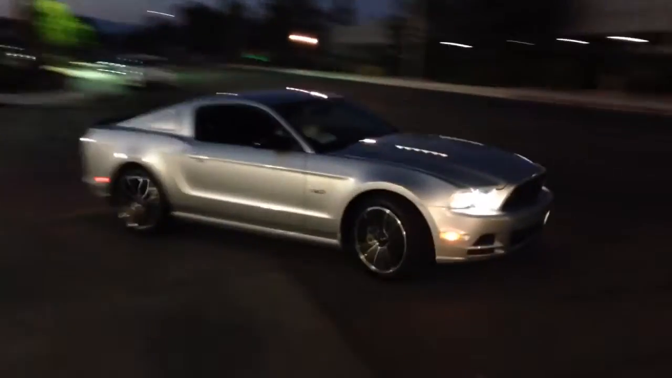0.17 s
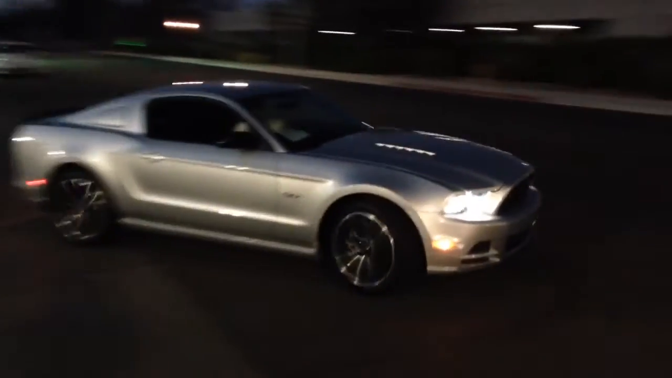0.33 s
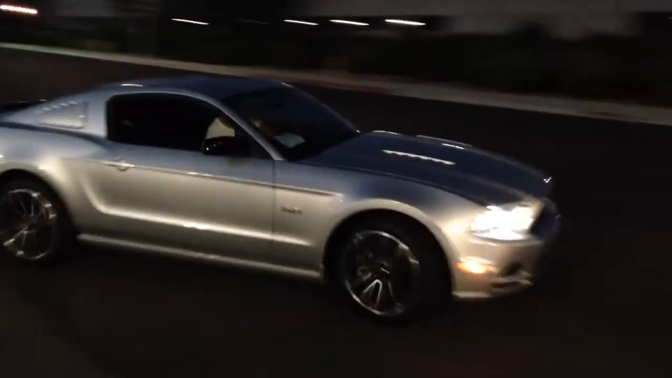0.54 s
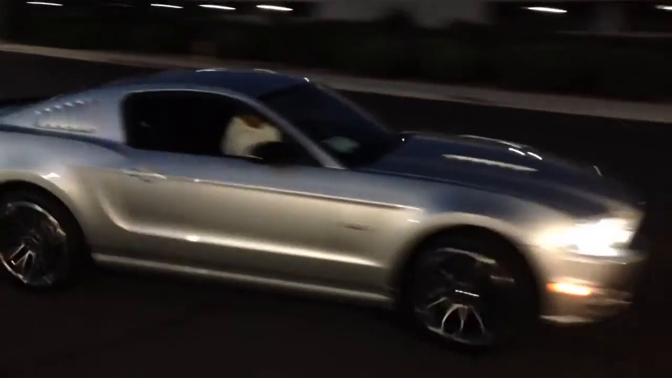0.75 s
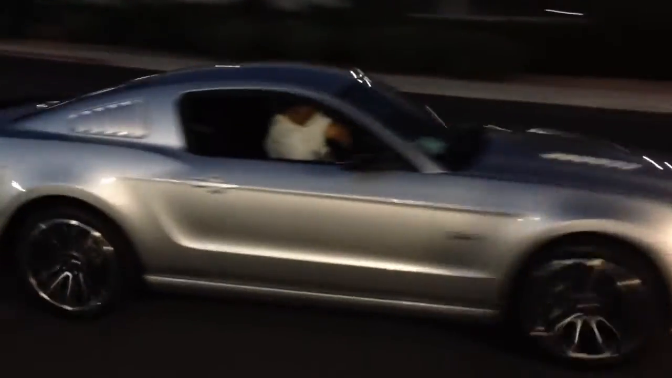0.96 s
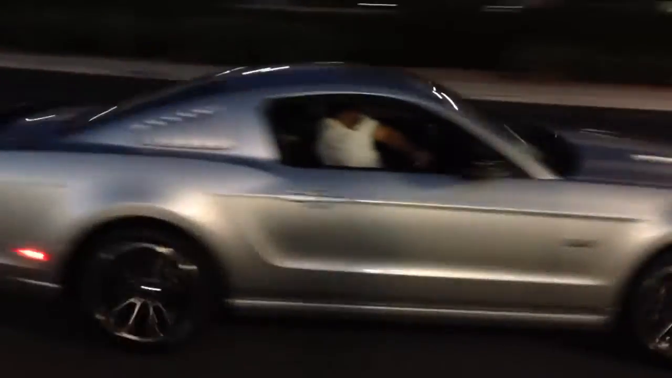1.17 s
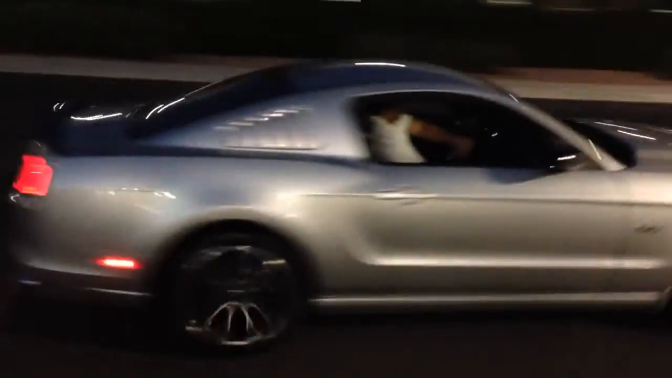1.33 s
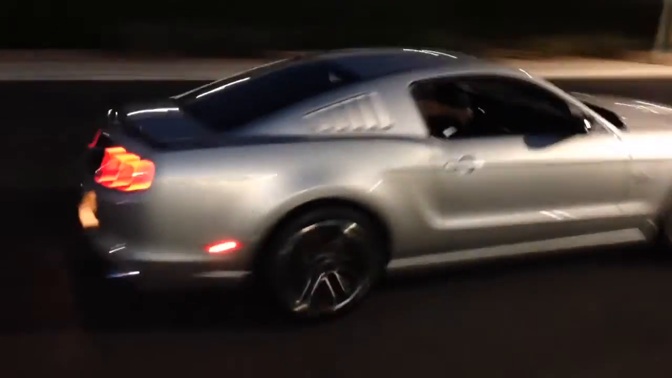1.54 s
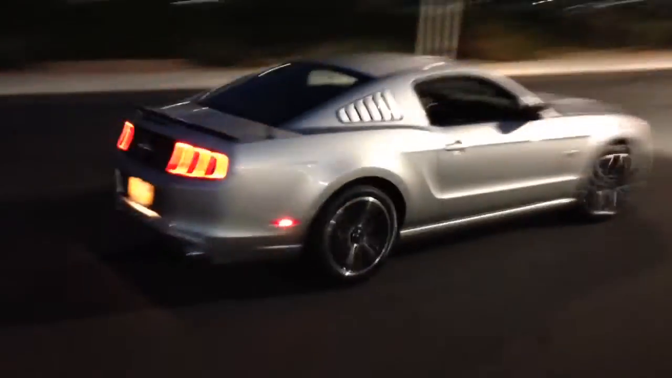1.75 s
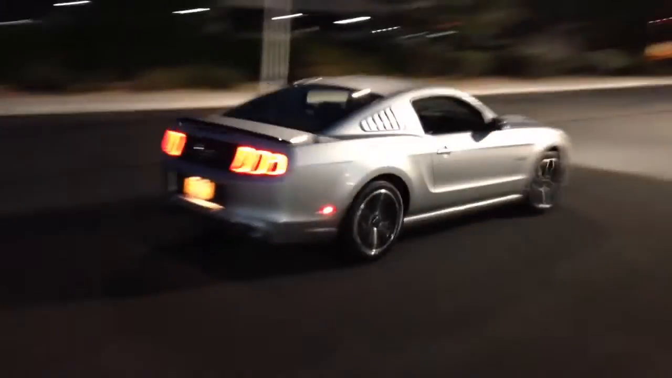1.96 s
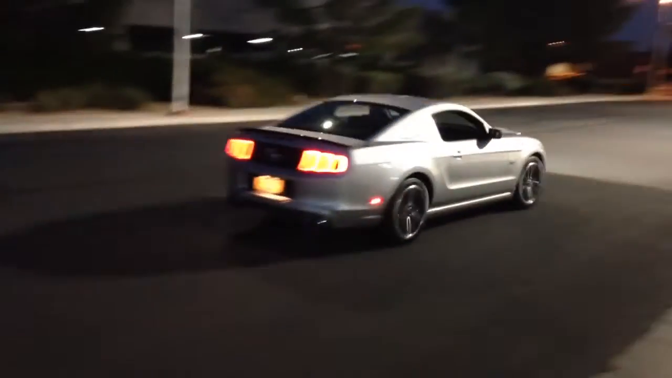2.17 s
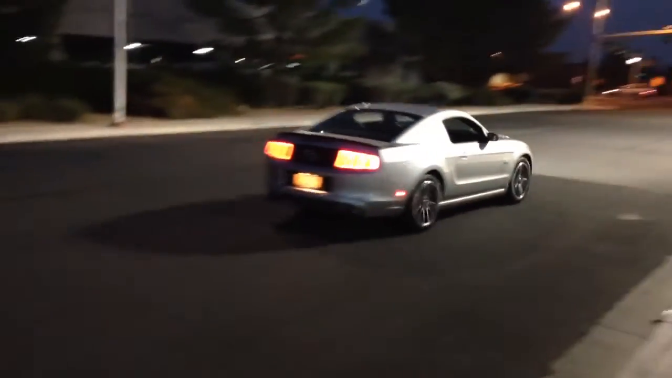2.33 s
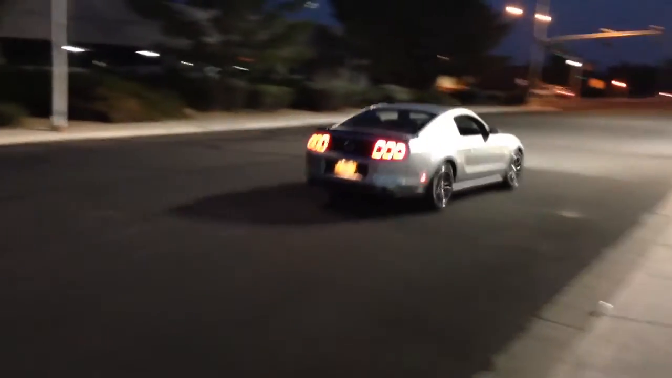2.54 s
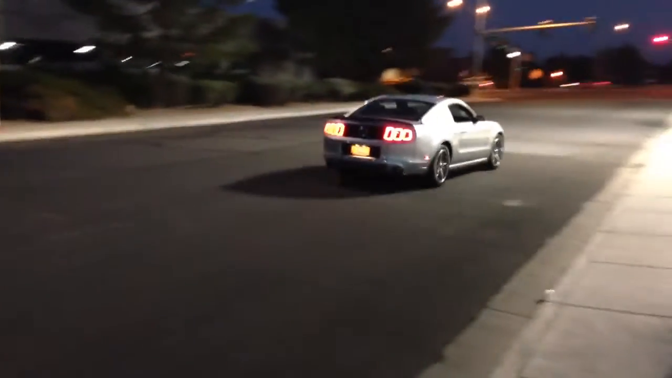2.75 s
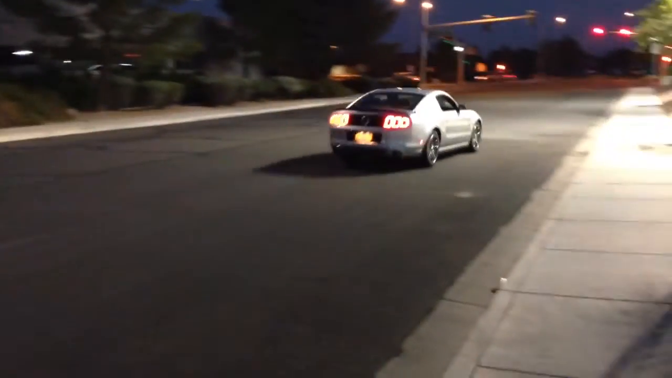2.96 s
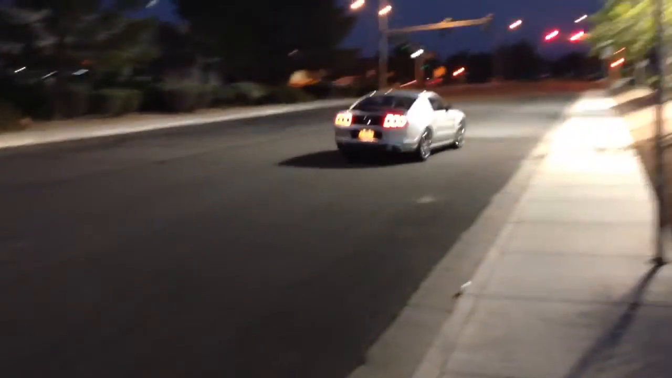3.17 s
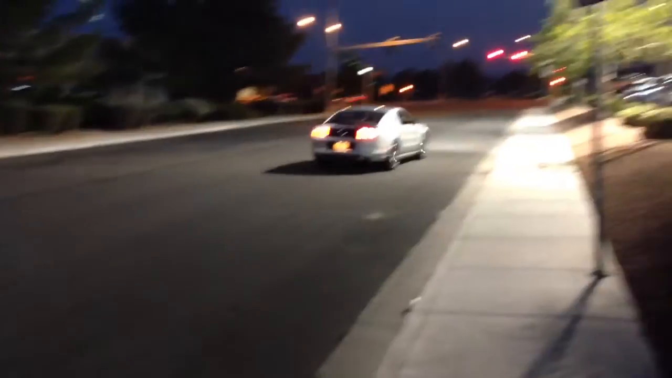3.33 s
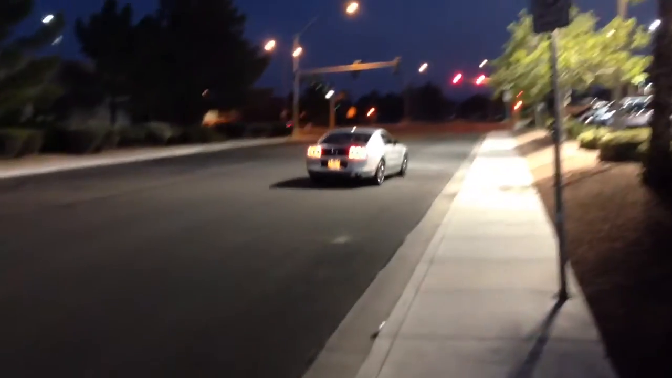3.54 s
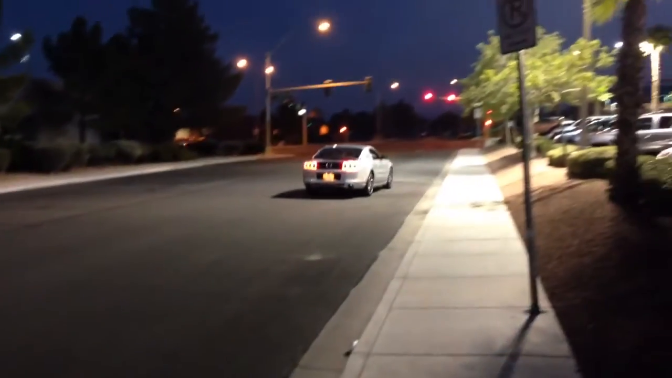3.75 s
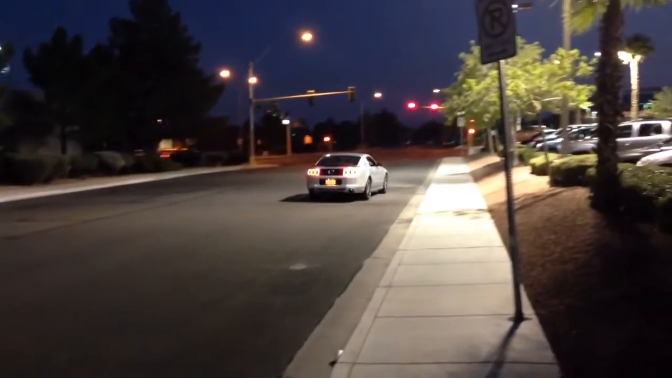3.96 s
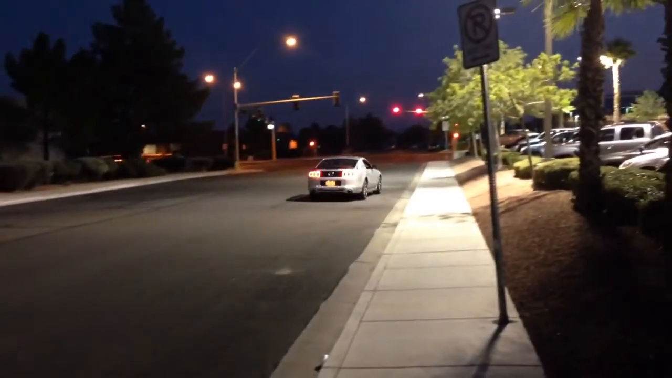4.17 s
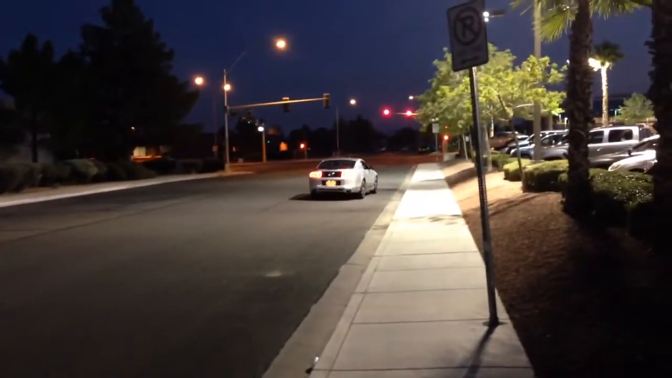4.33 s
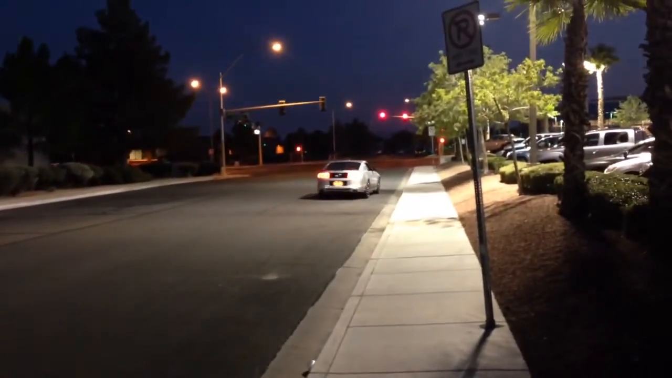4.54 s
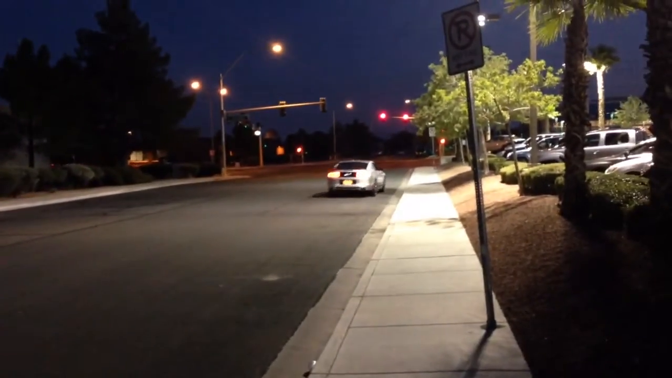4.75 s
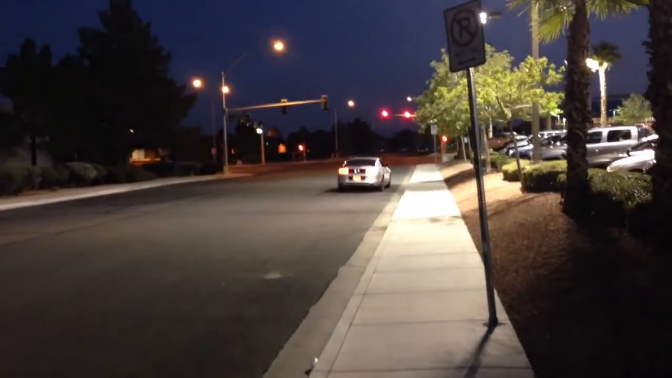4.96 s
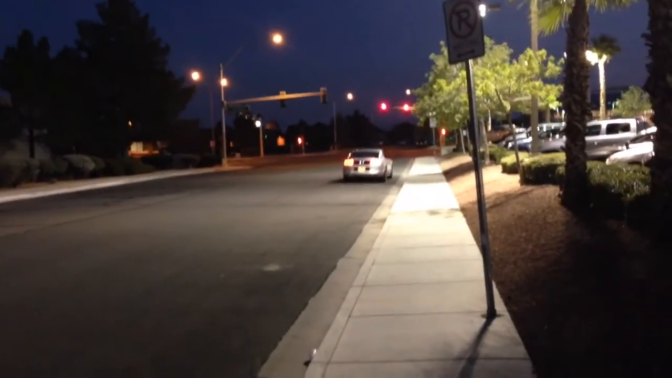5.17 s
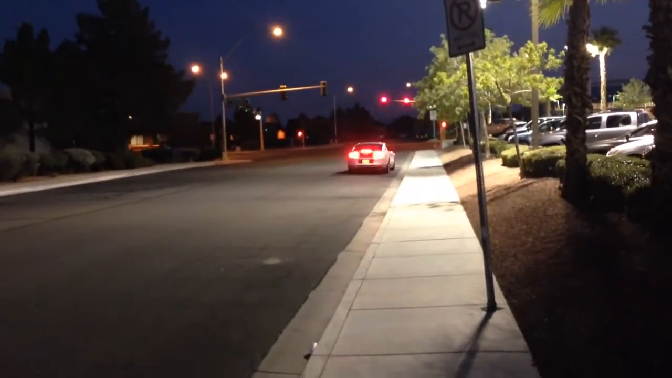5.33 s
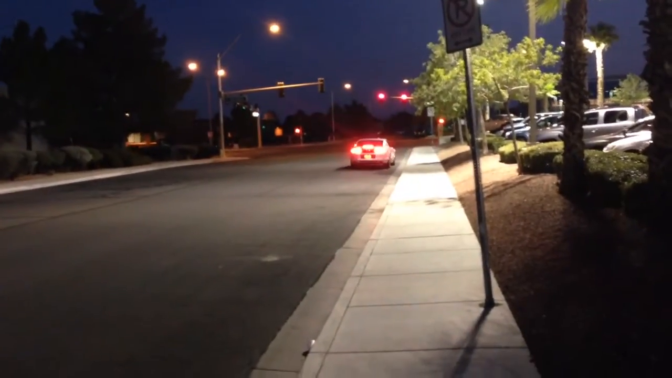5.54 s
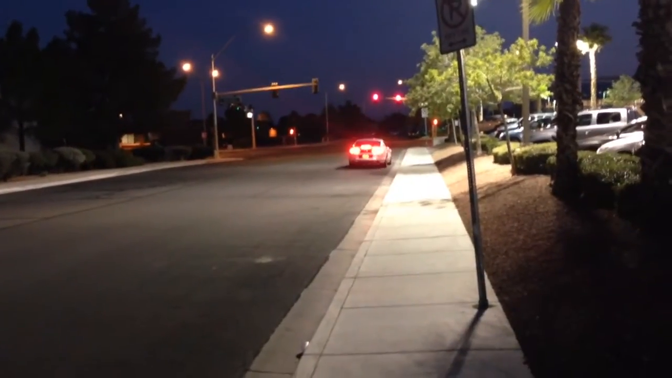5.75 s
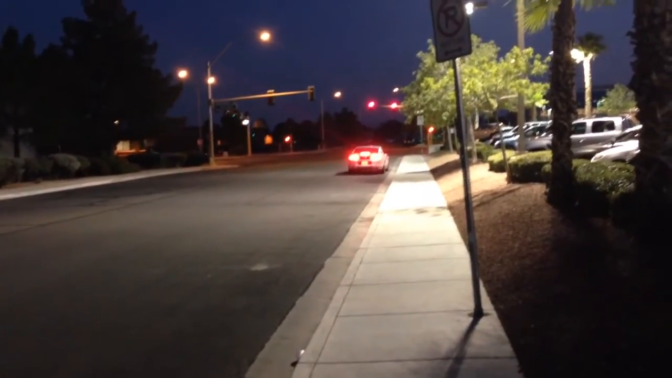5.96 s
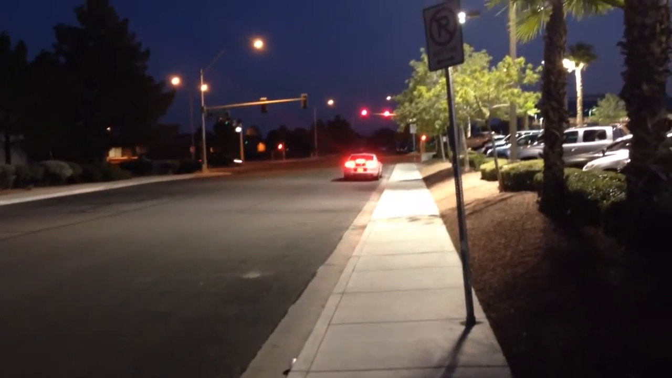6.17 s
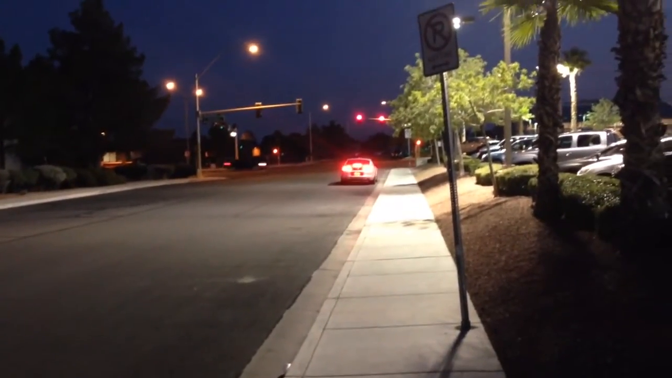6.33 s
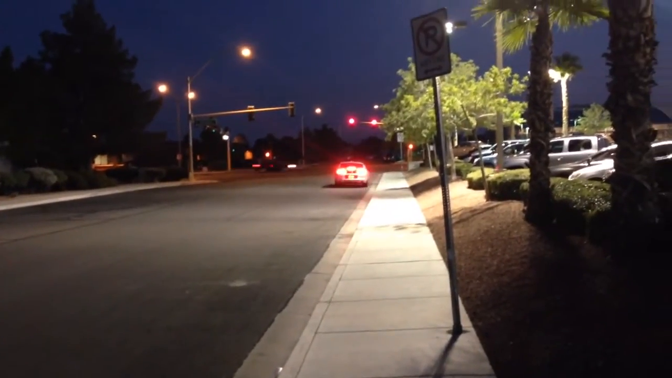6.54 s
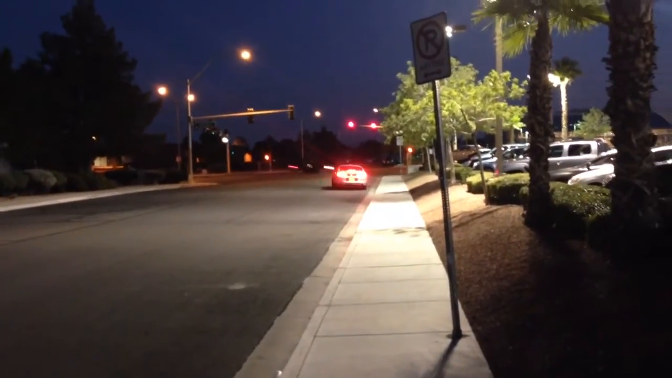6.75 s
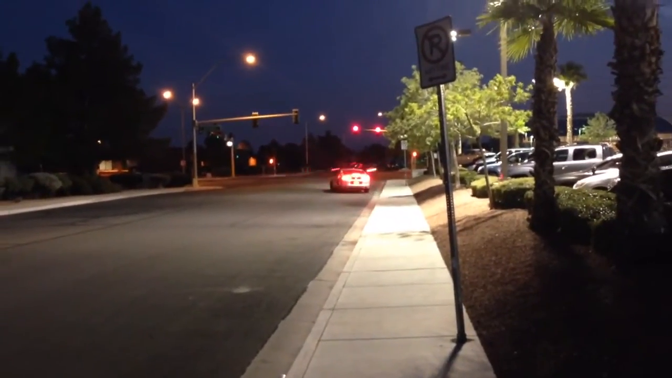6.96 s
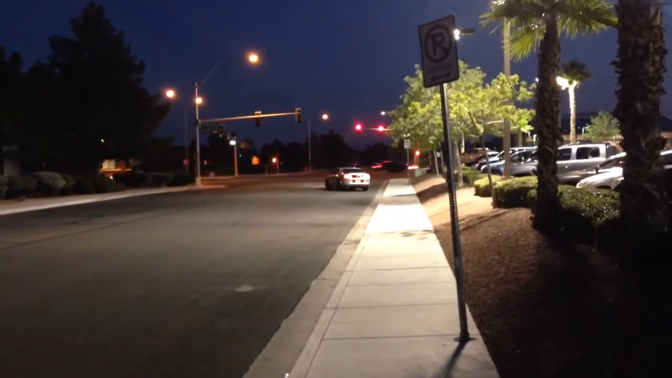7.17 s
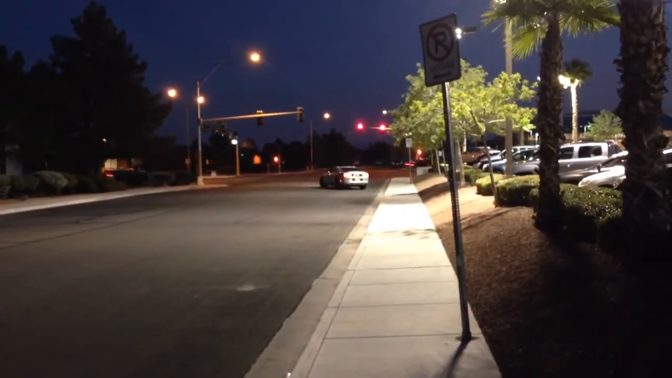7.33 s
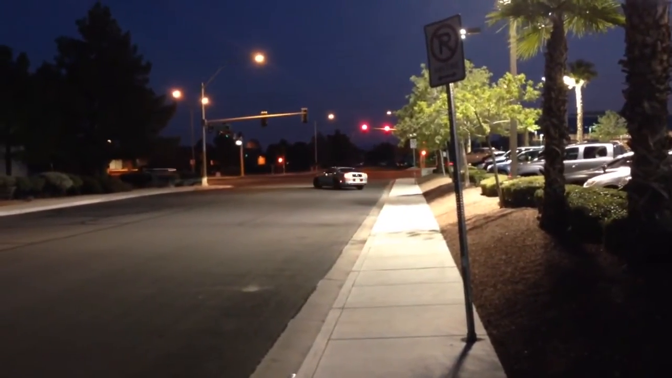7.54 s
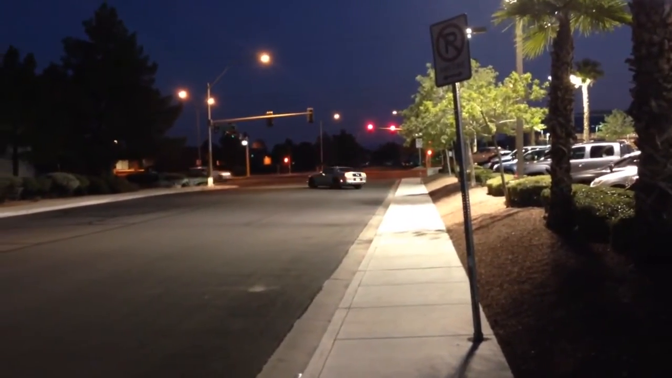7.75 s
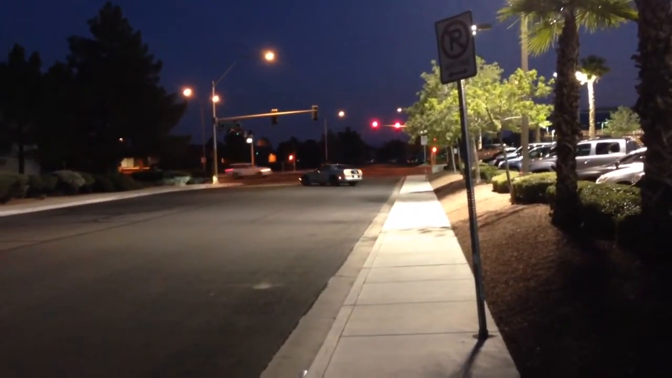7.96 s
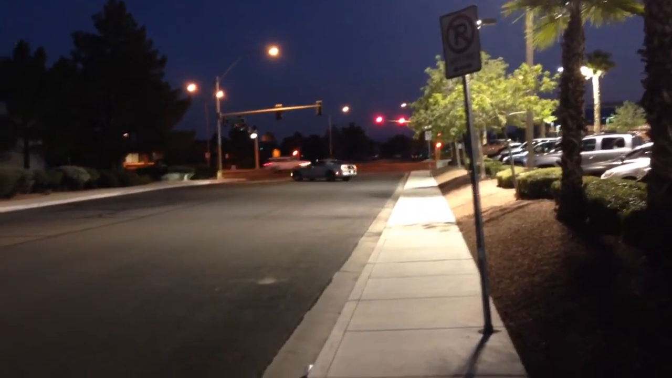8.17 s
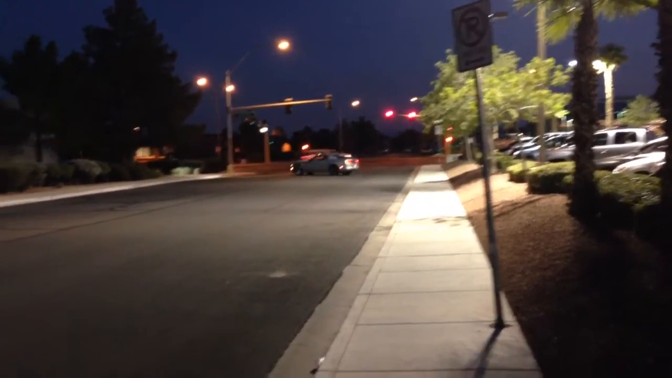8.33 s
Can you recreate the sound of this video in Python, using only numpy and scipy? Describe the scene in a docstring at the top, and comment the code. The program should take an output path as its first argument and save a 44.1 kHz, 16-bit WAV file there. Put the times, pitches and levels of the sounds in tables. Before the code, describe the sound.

Outdoors on a quiet night street, a V8 coupe with a loud exhaust accelerates past a close, fixed listening point. Its throbbing growl swells into a hard raspy bark with tyre hiss, then drops as it runs away. Off the throttle it burbles and pops, with one sharp backfire crack and brief echoes. The note keeps falling, faint far pops follow, and it sinks to a distant idle.

```python
"""On a street at night, a V8 coupe with a loud exhaust pulls away past the microphone and runs off down the road.
The exhaust note is a repeating firing cycle; shaped pulses and noise add its rasp, burble and gas hiss.
The driver lifts: fuel pops in the pipes, one backfire cracks and echoes, and the engine winds down to idle.
Tyres hiss as filtered noise on the asphalt. The car's own low rumble, also filtered noise, fades as it leaves,
over a quiet steady street sound and hiss."""
import sys
import numpy as np
from scipy import signal
from scipy.fft import rfft, irfft, next_fast_len
from scipy.io import wavfile
from scipy.ndimage import uniform_filter1d, map_coordinates

SR = 44100
rng = np.random.default_rng(int(sys.argv[2]) if len(sys.argv) > 2 else 0)


def put_to_file(sound):
    """Save the sound as 16-bit audio at rate SR, in the file named by the first command-line argument."""
    columns = np.atleast_2d(sound).T  # one column per channel
    safe = np.clip(columns, -1, 1)
    whole_steps = np.round(safe * 32767)
    wavfile.write(sys.argv[1], SR, whole_steps.astype(np.int16))


N = 374850

# engine speed, eight firings to a cycle: (t/s, rate/cycles per s)
ENGINE_SPEED = [(0.0, 18.2), (0.25, 18.37), (0.75, 19.68), (0.95, 20.62), (1.15, 21.3), (1.4, 22.8),
                (1.7, 24.26), (2.05, 25.52), (2.4, 26.3), (2.65, 26.46), (3.2, 26.12), (3.7, 25.54),
                (4.55, 23.19), (4.9, 22.41), (5.5, 20.55), (6.0, 18.94), (6.45, 16.83), (7.25, 14.28),
                (7.65, 11.8), (8.5, 11.8)]
# loudness of the exhaust note: (t/s, level/dB)
NOTE_LEVEL = [(0, -21.5), (.7, -18.5), (1.0, -13), (1.3, -11.5), (1.43, -12.5), (1.87, -12), (2.1, -18),
              (2.35, -20), (3.1, -32), (4.5, -30), (4.62, -29), (5.1, -27), (5.5, -30.5), (6.5, -35),
              (7.1, -42.5), (7.55, -48.5), (8.5, -49.5)]
# which of the two cylinder banks fires, in firing order: (bank 0 or 1)
FIRING_BANK = [0, 1, 0, 0, 1, 0, 1, 1]
# colour of the exhaust's gas hiss, and of another car far off: (f/Hz, level/dB)
MID_HISS = [(200, -15.5), (700, 7), (1100, 3.5), (1600, 3.5), (2300, -1), (2600, -3.5), (3300, -17.5),
            (4500, -40), (8000, -52)]
CLOSEST_M = 3.81  # distance of the car as it passes


def exhaust():
    """The note throbs with a rush of gas, breaks into a burble off the throttle and sinks to idle."""
    # how the idle lopes, strength of each firing: (level/dB)
    idle_strengths = [-7, 0, 0, -8, -19, -24, -21, -19]
    # pipe colour at idle: (f/Hz, level/dB)
    idle_pipe = [(30, -15), (68, 0), (90, -5), (130, 3), (200, -1), (260, 3), (320, -1), (377, 6), (420, 2),
                 (460, 5), (495, 10), (560, -7), (830, -22), (1100, -36), (3000, -70)]
    # colour of the gas rushing out with each throb: (f/Hz, level/dB)
    rush_colour = [(80, -34.5), (140, -3.5), (230, -4.5), (350, 2), (520, 1.5), (620, -3.5), (760, -4.5),
                   (1050, -12), (1600, -37), (5000, -81)]
    # rush relative to the note: (t/s, level/dB)
    rush_level = [(0, -6.5), (.75, -10), (1.1, -15.5), (1.9, -21), (2.5, -13), (3.1, -4.5), (3.6, -12.5),
                  (4.7, -23), (6.3, -12.5), (7.5, -20)]
    # colour of the burble: (f/Hz, level/dB)
    burble_colour = [(30, -36), (60, -21), (105, -7.5), (170, -0.5), (235, 6.5), (290, 1.5), (350, -3.5),
                     (440, -1.5), (600, -28), (900, -12.5), (1200, -55), (2500, -57), (3200, -71)]
    # spells of burbling: (start t/s, end t/s, added share of uneven burning/0-1)
    burble_spells = [(3.22, 4.51, 0.91), (6.532, 7.413, 0.86)]
    # fuel flares up in the pipes and the note swells: (start t/s, length/s, lift/dB)
    flare_ups = [(3.388, 0.059, 3), (3.54, 0.052, 2), (3.772, 0.2, 5), (3.966, 0.11, 7.5),
                 (4.202, 0.091, 5), (4.347, 0.12, 3), (6.634, 0.035, 10), (6.91, 0.19, 4.5),
                 (7.238, 0.09, 5)]

    idle_pulses = firings(idle_strengths, bank_lag_ms=.9, scatter_db=1.3, jitter_ms=.25, lead_cycles=.85)
    idle = smear(through(idle_pulses, ring(idle_pipe)), step_ms=4.1, keep=-.6)
    idling = ramp(at=7.0, width=.35)
    even = steady(drone() * (1 - idling) + steady(idle) * idling)

    # the rush swells and falls with the size of the note
    surge = uniform_filter1d(uniform_filter1d(np.abs(even), size=200), size=130)
    rush = amp(curves(rush_level)[0]) * steady(surge * noise(rush_colour))

    # a starved engine burns some charges hard and others hardly at all
    uneven_pulses = firings(np.zeros(len(FIRING_BANK)), bank_lag_ms=1.36, scatter_db=4.5, jitter_ms=0.82)
    burble = steady(through(uneven_pulses, ring(burble_colour)))
    spells = sum(part * window(start, end, edge=.12) for start, end, part in burble_spells)
    share = np.clip(.035 + spells, 0, 1)  # a little uneven burning at all times

    flare_db = sum(db * window(s, s + length, edge=.0043) for s, length, db in flare_ups)
    mix = np.sqrt(1 - share) * even + np.sqrt(share) * burble + rush
    return amp(curves(NOTE_LEVEL)[0] + flare_db) * mix


def drone():
    """The clean note, a little unsteady, changes with the side of the car heard, then coasts through resonances."""
    # strongest parts of the note under load, from each side: (multiple of the cycle rate, level/dB)
    ahead = [(7, -13.5), (8, -11), (9, -12), (12, -9), (14, -16), (15, -6.5), (16, 1), (17, -7), (18, -13),
             (19, -0.5), (20, -12.5), (22, -8.5), (23, -11), (27, -14.5)]
    beside = [(6, -16), (8, -4.5), (9, -15.5), (10, -13), (11, -5.5), (12, -6), (14, -4.5), (15, -18),
              (16, -5), (17, 0), (18, -12), (19, 2.5), (20, -4.5), (21, -12.5), (22, -2.5)]
    facing = [(6, -18), (7, -21.5), (8, -9), (9, -16), (10, -7), (11, -19.5), (12, -9.5), (13, -19.5),
              (14, -3), (15, -3), (16, 2.5), (17, -11), (18, -6), (19, -17), (21, -20)]
    behind = [(5, -17.5), (6, -5), (7, -25), (8, -32), (9, -23), (11, 1.5), (12, -3), (14, -12), (15, -15),
              (16, -4), (17, -9.5), (19, -0.5), (20, -6.5), (22, -13.5), (24, -10.5), (31, -12),
              (32, -11.5), (36, -14.5)]
    easing = [(5, -13.5), (6, -1.5), (7, -9.5), (8, -10.5), (11, -6), (12, -23), (13, -9.5), (14, -1.5),
              (16, -22.5), (17, -5), (18, -14), (19, -0.5), (20, -1), (22, -13.5), (24, -13.5), (30, -14),
              (33, -12.5), (35, -6)]
    # the five parts in turn: (start t/s, blend/s, delay/cycles, smearing by the pipes/cycles,
    # place of the throb in the cycle/0-1, throb/dB)
    aspects = [(-1, .1, .703, .064, .95, 1.8), (.82, .05, .828, -.066, .47, 1.6),
               (1.16, .07, .641, -.113, .63, 1.5), (2.06, .12, .68, -.076, .97, 1),
               (2.5, .18, .68, -.076, .97, .7)]
    # strongest parts off the throttle: (multiple of the cycle rate, level/dB)
    coasting = [(5, -6.5), (6, 8), (7, 0), (8, -2), (9, -10.5), (10, 0), (11, -27), (12, -8.5), (13, -17.5),
                (14, -10.5), (15, -3.5), (16, -5.5), (17, -21.5), (18, -12), (20, -13.5), (21, -17.5),
                (22, -17.5), (23, -22.5), (25, -20), (26, -16.5), (28, -19)]
    # pipe resonances that the falling note sweeps through: (f/Hz, level/dB)
    coast_pipe = [(60, -34), (100, -23), (135, -13.5), (172, -3), (205, -.5), (232, 2.5), (260, -2),
                  (280, -1), (340, -2.5), (385, -2), (450, 4), (490, 3), (600, -6), (1000, -25)]

    timing_flutter = .0012 * wobble(130)  # in cycles
    crank = np.cumsum(curves(ENGINE_SPEED)[0]) / SR + timing_flutter
    note = np.zeros(N)
    for orders, (start, blend, *shape) in zip([ahead, beside, facing, behind, easing], aspects):
        turn = ramp(start, blend)
        note = note * (1 - turn) + turn * cycling(crank, orders, *shape)
    coast = cycling(crank, coasting, delay=.22, smearing=.007, throb=.7, throb_db=1)
    coast = steady(through(coast, ring(coast_pipe)))
    off = ramp(at=3.15, width=.37)
    flutter_db = .9 * wobble(55)
    return steady((note * (1 - off) + coast * off) * amp(flutter_db))


def cycling(crank, orders, delay, smearing, throb, throb_db):
    """One firing cycle, built from cosines at multiples of its rate, repeats as the crank turns."""
    cycle = np.linspace(0, 1, 4096)
    wave = np.zeros(len(cycle))
    for k, db in orders:
        turns = k * (cycle - delay) - smearing * (k - 15) ** 2
        wave -= amp(db) * np.cos(2 * np.pi * turns)
    swell = amp(throb_db * np.cos(2 * np.pi * (cycle - throb)))
    return np.interp(crank % 1, cycle, unit(wave * swell))


def firings(strength_db, bank_lag_ms, scatter_db, jitter_ms, lead_cycles=.28):
    """One pressure pulse per firing; the two banks reach the ear by paths of different length."""
    crank = len(FIRING_BANK) * (np.cumsum(curves(ENGINE_SPEED)[0]) / SR + lead_cycles)
    number = np.arange(np.ceil(crank[0]), crank[-1]).astype(int)
    cylinder = number % len(FIRING_BANK)
    chance = rng.standard_normal((2048, 2))[:len(number)]
    late_ms = bank_lag_ms * np.array(FIRING_BANK)[cylinder] + jitter_ms * chance[:, 0]
    times = np.interp(number, crank, np.arange(N) / SR) + late_ms / 1000
    sizes_db = np.array(strength_db)[cylinder] + scatter_db * chance[:, 1]
    return pulses(times, -amp(sizes_db))


def rasp():
    """Under load each pulse steepens into a bark and drives a puff of turbulent gas from the tailpipe."""
    # strength of each firing, heard from beside and from behind: (level/dB)
    beside_strengths = [-4, -3, -12, -3, -2, -10, 0, -2]
    behind_strengths = [0, -2, -9, -13, -11, -16, -19, -13]
    # colours of the bark, of the bark at high revs and of the bark from behind: (f/Hz, level/dB)
    bark_colour = [(450, -36), (590, 18.5), (670, 5.5), (770, 17), (850, 5), (940, 13.5), (1030, 6),
                   (1120, 13), (1330, 12.5), (1600, -2.5), (1900, -34.5), (3000, -61.5)]
    open_colour = [(450, -23), (585, 10), (700, -11.5), (800, 6.5), (920, 12), (1050, 13), (1360, 12),
                   (1540, -3.5), (1850, 5.5), (2200, -8), (3000, -47.5)]
    behind_colour = [(480, -35.5), (620, 2), (800, -0.5), (950, -4.5), (1150, -11.5), (1500, -17.5),
                     (1900, -23.5), (3000, -54.5)]
    # colour of the gas jet: (f/Hz, level/dB)
    jet_colour = [(900, -13), (1500, 0.5), (2000, 3), (2500, -6), (3300, -29), (4200, -34), (6000, -29),
                  (12000, -70.5)]
    # the tailpipes point at the microphone: (from t/s, until t/s)
    facing_span = (1.23, 2.02)

    note_db, = curves(NOTE_LEVEL)
    beside = firings(beside_strengths, bank_lag_ms=.4, scatter_db=1.6, jitter_ms=.06, lead_cycles=.985)
    behind = firings(behind_strengths, bank_lag_ms=-.5, scatter_db=1.8, jitter_ms=.13, lead_cycles=.95)
    gone = ramp(at=2.29, width=.045)
    blows = unit(beside) * (1 - gone) + unit(behind) * gone

    # each blow leaves a puff that dies by 60 dB in 16 ms
    puff = unit(np.abs(through(blows, amp(-60 * np.arange(SR // 20) / SR / .016))))

    def gas(flow):
        """Turbulent noise: puffs on top of a steady flow."""
        return unit((puff + flow) * rng.standard_normal(N))

    # ahead of the car the pulses arrive weaker; they sharpen once the pipes face the microphone
    sharp = .12 + .88 * ramp(at=1.15, width=.1)
    bursts = amp(1.4 * wobble(40) * (1 - gone))
    blast = road_bounce(bursts * (sharp * blows + .3 * gas(flow=.7)))

    opened = ramp(at=1.687, width=.032)
    low_revs = steady(through(blast, ring(bark_colour)))
    high_revs = steady(through(blast, ring(open_colour)))
    voice = steady(low_revs * (1 - opened) + high_revs * opened)
    facing = ramp(facing_span[0], width=.07) * (1 - ramp(facing_span[1], width=.18))
    bark = amp(note_db - 20.5 + 10 * facing) * voice

    far_blast = smear(through(blast, ring(behind_colour)), step_ms=2.685, keep=.36)
    far_bark = amp(-34.5) * steady(far_blast)

    # the gas jet grows at high revs
    jet_db = note_db - 22.5 + 5.5 * ramp(at=1.764, width=.02)
    jet_source = .28 * sharp * blows + gas(flow=1.0)
    jet = amp(jet_db) * steady(through(jet_source, ring(jet_colour)))

    lifted = ramp(at=2.87, width=1)  # the driver comes off the throttle
    return (bark * (1 - gone) + far_bark * gone + jet) * (1 - lifted)


def road_bounce(x):
    """A second path off the road; its changing delay sweeps peaks and dips through the rasp."""
    delay_ms = 2.44 * CLOSEST_M / distance() + .23 * wobble(9)
    delay = delay_ms * SR / 1000
    return x + .41 * np.interp(np.arange(N) - delay, np.arange(N), x)


def overrun():
    """Off the throttle one cylinder spits once a cycle; the spits swell and then fade."""
    # strength of each firing: (level/dB)
    spit_strengths = [-40, -40, 0, -14, -16, -40, -40, -16]
    # colour of a spit: (f/Hz, level/dB)
    spit_colour = [(250, -16.5), (600, -2), (900, 7.5), (1200, -7), (1700, -6), (2600, -24.5), (4000, -48),
                   (8000, -80.5)]
    # loudness of the spitting: (t/s, level/dB)
    spit_level = [(3.0, -62), (3.4, -58), (4.2, -46.5), (4.6, -49), (5.3, -50), (6.5, -62)]

    spits = firings(spit_strengths, bank_lag_ms=0, scatter_db=2.5, jitter_ms=.3, lead_cycles=.94)
    blurred = smear(through(spits, ring(spit_colour)), step_ms=2.3, keep=.26)
    return amp(curves(spit_level)[0]) * steady(blurred)


def smear(x, step_ms, keep):
    """A few quick reflections between underbody and road blur each pulse; a positive keep flips every other one."""
    step = max(1, round(step_ms * SR / 1000))
    return x + sum((-keep) ** k * np.pad(x, (k * step, 0))[:N] for k in range(1, 4))


def afterfire():
    """Unburnt fuel goes off in the hot pipes: dull pops and one sharp crack, scattered by kerbs and hedges."""
    # pops, the one backfire and its thin echoes off walls: (t/s, strength/dB)
    pop_list = [(3.37, -39), (3.413, -26), (3.531, -32), (3.764, -19.5), (3.803, -33), (3.844, -17),
                (3.883, -20.5), (3.948, -25), (4.019, -9.5), (4.169, -32), (4.209, -17.5), (4.25, -21),
                (4.35, -19.5), (4.375, -28), (4.42, -26), (4.464, -28.5), (4.505, -37), (6.615, -38),
                (6.648, -36), (6.665, -32.5), (6.777, -42), (6.938, -39), (7.038, -38.5), (7.103, -36.5),
                (7.269, -45), (7.371, -42.5)]
    backfire = [(4.047, -3)]
    wall_echoes = [(4.087, -31), (4.133, -31)]
    # colours of a near pop, a pop far down the street, the backfire and its echoes: (f/Hz, level/dB)
    near_colour = [(100, -8.5), (300, 8.5), (900, 8), (1600, -4.5), (2400, -24), (4000, -40), (9000, -58)]
    far_colour = [(40, -43), (70, -22), (150, 2), (290, 16), (400, 10), (540, 10), (750, -4.5), (1050, -8),
                  (1400, -14), (2400, -23.5), (4000, -45)]
    crack_colour = [(100, 3), (500, 8), (1200, 12), (2200, 10), (3000, 0), (3700, 4), (4500, -9),
                    (5500, -20), (6600, -15), (7300, -38), (9000, -56), (14000, -66)]
    echo_colour = [(300, -14), (1200, -2), (2600, 3), (3500, -7), (4300, -15), (5000, -30), (8000, -50)]

    s, db = np.transpose(pop_list)
    blasts = pulses(s, -amp(db))
    far = ramp(at=4.51, width=.14)
    near_pops = through(blasts * (1 - far), ring(near_colour))
    pops = near_pops + amp(.5) * through(near_pops, scatter(t60=.089))
    # from down the street a pop is duller and all echo
    far_pops = through(blasts * far, ring(far_colour))
    pops += amp(14.5) * through(far_pops, scatter(t60=.067))

    s, db = np.transpose(backfire)
    crack = through(pulses(s, -amp(db)), ring(crack_colour))
    crack_spray = amp(-2) * through(crack, scatter(t60=.075))
    s, db = np.transpose(wall_echoes)
    echoes = through(through(pulses(s, amp(db)), ring(echo_colour)), scatter(t60=.045))
    return pops + crack + crack_spray + amp(6) * echoes


def scatter(t60):
    """A dying spray of small reflections with energy 1; t60 is the time in s to fall by 60 dB."""
    t = np.arange(SR // 4) / SR
    spray = rng.standard_normal(len(t)) * amp(-60 * t / t60)
    return spray / np.linalg.norm(spray)


def gas_hiss():
    """A steady gas hiss from the exhaust, as filtered noise, fading by 18 dB a second after 6.28 s."""
    t = np.arange(N) / SR
    level_db = -47.5 - 18 * np.maximum(t - 6.28, 0) + .5 * wobble(14.0)
    return amp(level_db) * noise(MID_HISS) * ramp(at=2.3, width=.15)


def car_rumble():
    """The car's own low rumble, as filtered noise, wavers and fades as it leaves."""
    near = 1 - ramp(at=7.2, width=.6)
    level_db = -49.0 + 6.8 * near + 2.5 * wobble(2.3)
    return amp(level_db) * noise([(20, -29.5), (45, -7), (68, -1.5), (95, -5.5), (200, -0.5), (600, -49.5)])


def tyres():
    """Tread hisses on the asphalt, as filtered noise, loudest as the car passes."""
    # colour of the hiss: (f/Hz, level/dB)
    hiss_colour = [(1500, -0.5), (3300, 6.5), (4300, -2), (5300, -5.5), (7500, -2.5), (9000, -8),
                   (11000, -15), (15000, -19)]
    # 29 dB lost for each tenfold distance
    hiss_db = -40.5 - 29 * np.log10(distance() / CLOSEST_M) + .5 * wobble(14.0)
    return amp(hiss_db) * noise(hiss_colour)


def distance():
    """Metres from the car to the microphone; in one gear the road speed follows the engine."""
    metres_per_cycle, pass_s = .27, 1.084
    road = metres_per_cycle * np.cumsum(curves(ENGINE_SPEED)[0]) / SR
    return np.hypot(CLOSEST_M, road - np.interp(pass_s, np.arange(N) / SR, road))


def other_car():
    """Another car crosses the far junction: filtered noise that swells and fades with its distance."""
    # the crossing: (t/s, half length/s, level/dB)
    crossing = (8.23, 0.12, -60.5)
    at, half, db = crossing
    return amp(db) / np.hypot(1, (np.arange(N) / SR - at) / half) * noise(MID_HISS)


def background():
    """A quiet steady street sound and a faint hiss, both filtered noise."""
    # colour of the street sound: (f/Hz, level/dB)
    background_colour = [(20, -25), (50, -9), (70, -4), (90, -9), (140, -3), (300, -13), (480, -16),
                         (650, -19), (1100, -27), (2400, -24), (4000, -48)]
    hiss = noise([(1000, -9.5), (3500, -2.5), (8000, -6.5), (15000, -11.0)])
    return amp(-51.5) * noise(background_colour) + amp(-63.5) * hiss


def street(x):
    """Walls and trees answer 20 ms later with a tail of noise; treble dies first."""
    # time for the tail to fall by 60 dB: (f/Hz, t/s)
    decay_times = [(150, 0.66), (1000, 0.34), (3000, 0.016), (8000, 0.0043)]
    hz, t, z = signal.stft(rng.standard_normal(SR // 2), SR, nperseg=256)
    fading = z * amp(-60 * t / along(decay_times, hz)[:, None])
    tail = signal.istft(fading, SR, nperseg=256)[1]
    return through(x, np.pad(tail, (SR // 50, 0)) / np.linalg.norm(tail))


def amp(db):
    """Decibels to gain."""
    return 10 ** (np.asarray(db) / 20)


def unit(x):
    """x at rms 1."""
    return x / np.sqrt(np.mean(x ** 2) + 1e-20)


def steady(x):
    """x at rms 1 from moment to moment, keeping its throb."""
    power = uniform_filter1d(uniform_filter1d(x * x, size=5000), size=3000)
    return x / np.sqrt(np.abs(power) + 1e-14)


def along(points, hz):
    """Values between (f/Hz, value) points, read on a log frequency axis."""
    f, v = np.transpose(points)
    return np.interp(np.log(hz + 1), np.log(f + 1), v)


def curves(rows):
    """One value per sample for each column after the time."""
    s, *cols = np.transpose(rows)
    return [np.interp(np.arange(N) / SR, s, c) for c in cols]


def ramp(at, width):
    """A smooth step from 0 to 1 around a moment (both in s)."""
    return .5 + .5 * np.tanh((np.arange(N) / SR - at) / width)


def window(start, end, edge):
    """Smoothly on at one moment and off at another (all in s)."""
    return ramp(start, edge) * (1 - ramp(end, edge))


def wobble(rate):
    """A smooth random curve, with rate random points a second."""
    return map_coordinates(rng.standard_normal(int(N * rate / SR) + 4), [np.arange(N) * rate / SR])


def ring(spectrum, size=8192):
    """Impulse response with the given colour, starting at once, with a peak of 1."""
    # folding the cepstrum forward packs the energy as early as possible
    cepstrum = irfft(np.log(amp(along(spectrum, np.fft.rfftfreq(size, 1 / SR)))))
    cepstrum[1:size // 2] *= 2
    cepstrum[size // 2 + 1:] = 0
    response = irfft(np.exp(rfft(cepstrum)))
    return response / np.abs(response).max()


def through(x, response):
    """x sent through an impulse response."""
    return signal.oaconvolve(x, response)[:N]


def noise(spectrum):
    """Coloured noise of rms 1."""
    return unit(through(rng.standard_normal(N), ring(spectrum)))


def pulses(times, sizes):
    """Impulses at times in s, each shared between the two nearest samples."""
    at = np.clip(times * SR, 0, N - 2)
    i = at.astype(int)
    sizes = sizes * (i > 0) * (i < N - 2)
    return np.bincount(i, sizes * (1 - at + i), N) + np.bincount(i + 1, sizes * (at - i), N)


def scene():
    """As the car runs off, more of it arrives by way of the street; the pops stir the street too."""
    engine = exhaust() + rasp() + overrun()
    pops = afterfire()
    wet = amp(-22 + 5 * ramp(at=3, width=1) + 6 * ramp(at=6.6, width=.3))
    echo = street(wet * engine + amp(-19.0) * pops)
    near_and_far = (engine + echo) / np.sqrt(1 + 3 * wet ** 2)
    steady_sounds = gas_hiss() + car_rumble() + tyres() + other_car() + background()
    return (near_and_far + pops + steady_sounds)[None]


def record(dry):
    """The microphone rounds off the highest peaks, dips in the upper midrange and stops at a top frequency."""
    rounded = dry / (1 + np.abs(dry / .78) ** 8) ** (1 / 8)
    size = next_fast_len(N + SR // 2)
    hz = np.fft.rfftfreq(size, 1 / SR)
    # deepest near 2.8 kHz; everything above the dip stays 6 dB down
    dip = amp(along([(2520, -0.5), (2720, -10.5), (2950, -10), (3130, -6)], hz))
    below_top = hz < 15330
    return irfft(rfft(rounded, size) * dip * below_top, size)[..., :N]


dry = scene()
out = record(dry)
put_to_file(out)
```